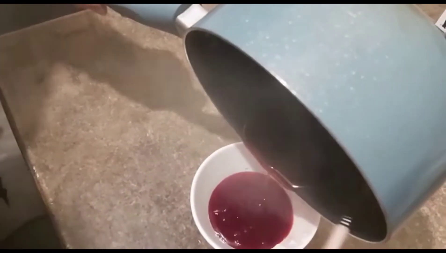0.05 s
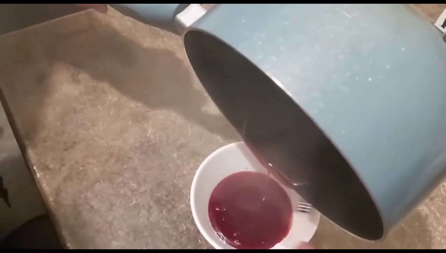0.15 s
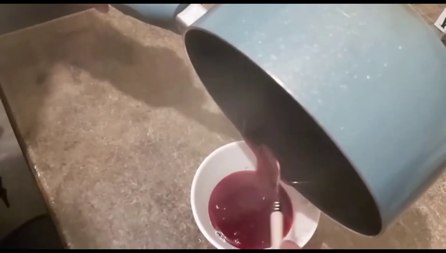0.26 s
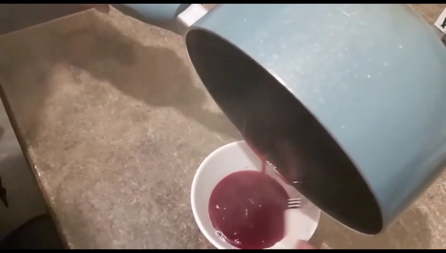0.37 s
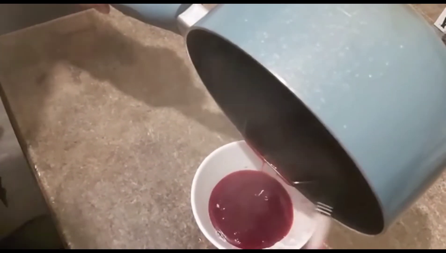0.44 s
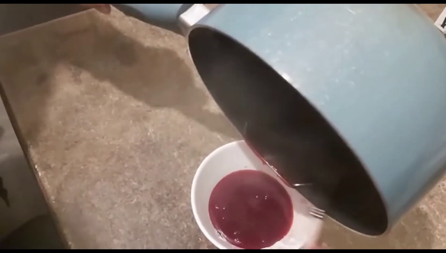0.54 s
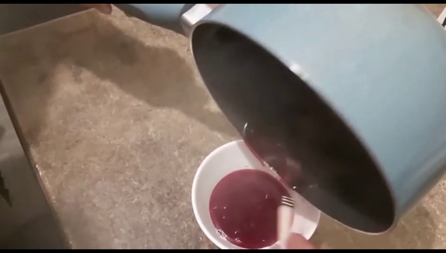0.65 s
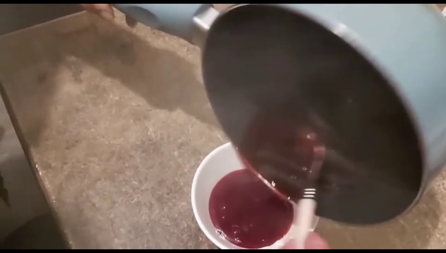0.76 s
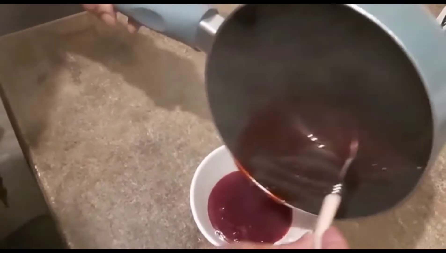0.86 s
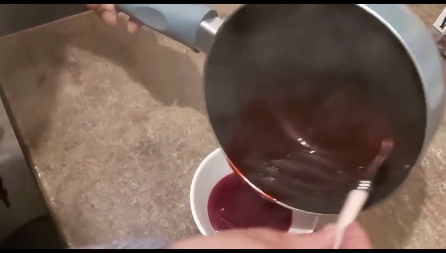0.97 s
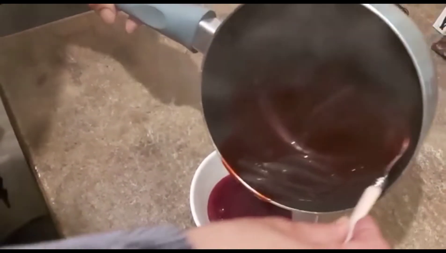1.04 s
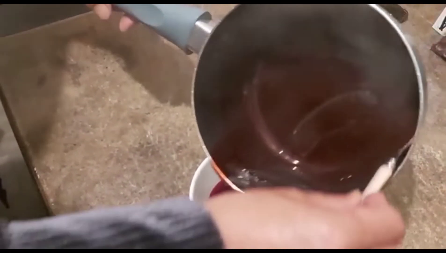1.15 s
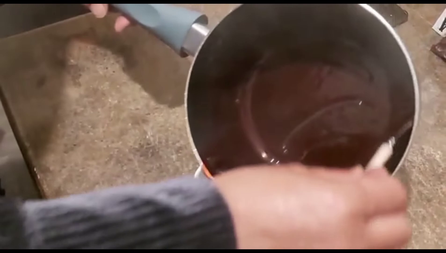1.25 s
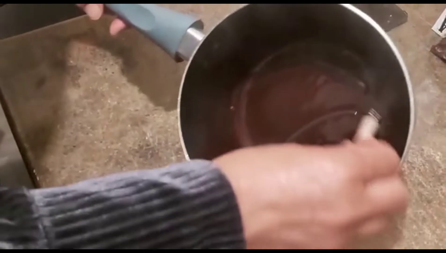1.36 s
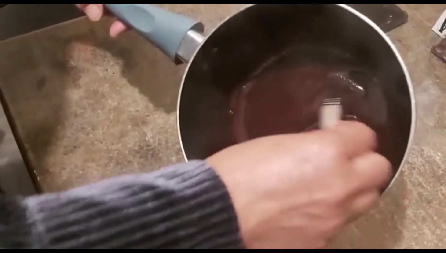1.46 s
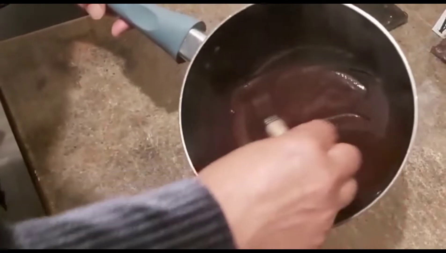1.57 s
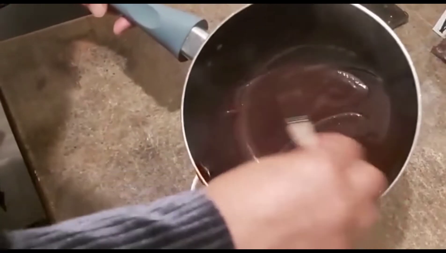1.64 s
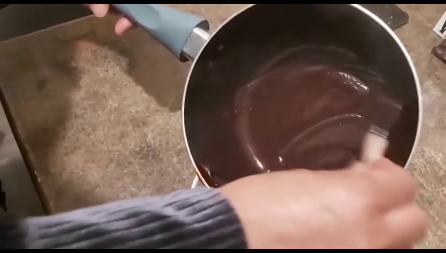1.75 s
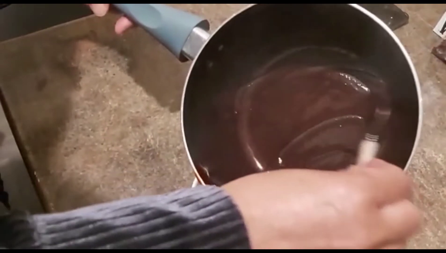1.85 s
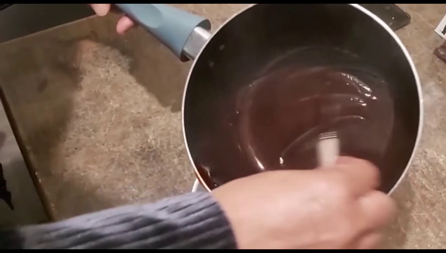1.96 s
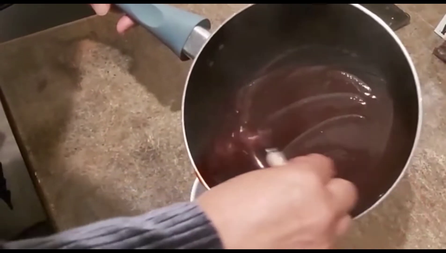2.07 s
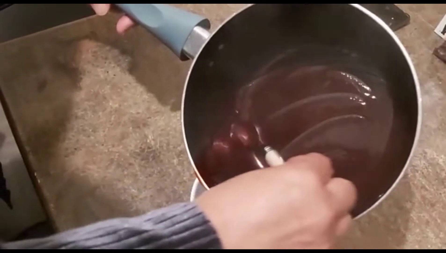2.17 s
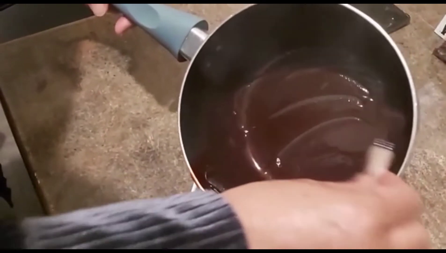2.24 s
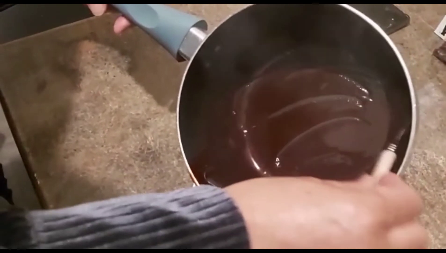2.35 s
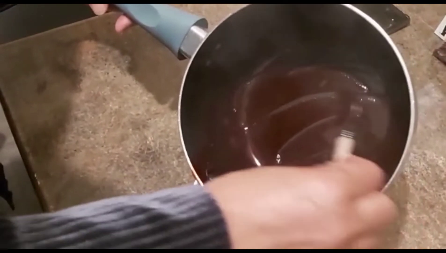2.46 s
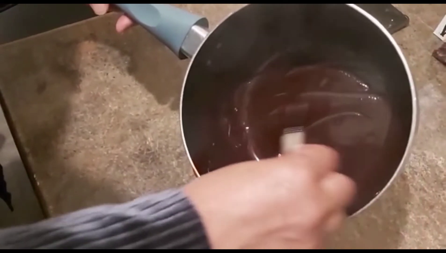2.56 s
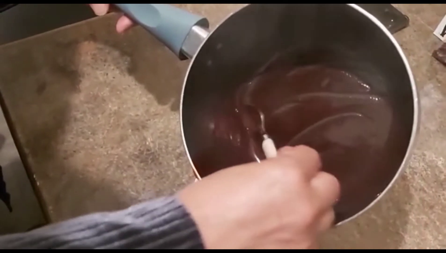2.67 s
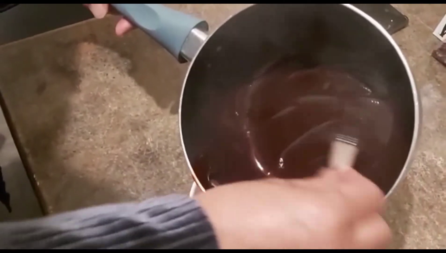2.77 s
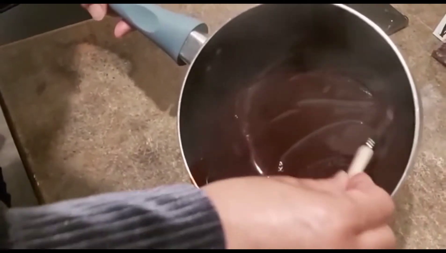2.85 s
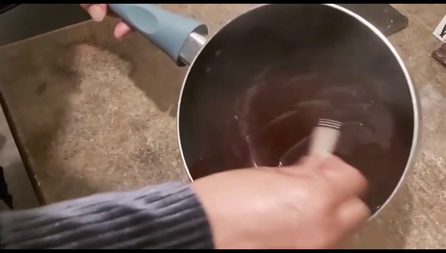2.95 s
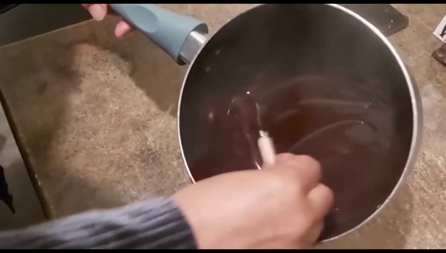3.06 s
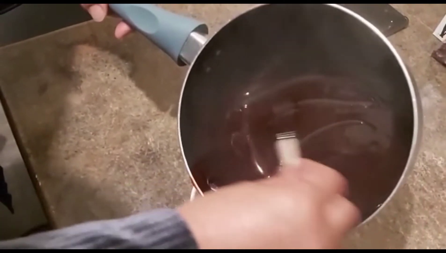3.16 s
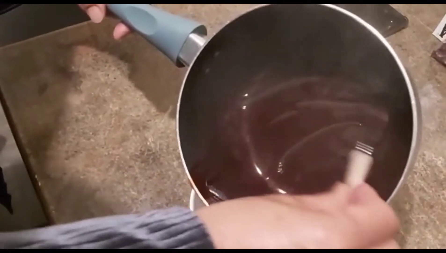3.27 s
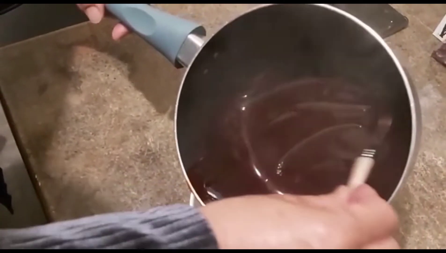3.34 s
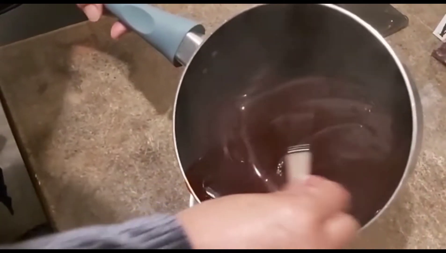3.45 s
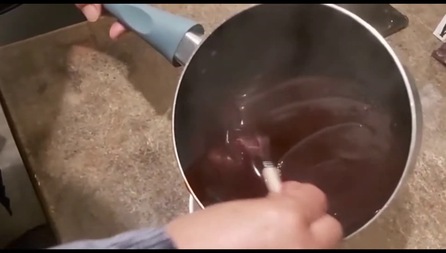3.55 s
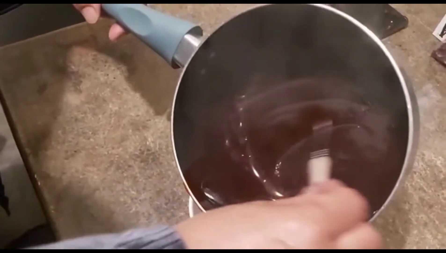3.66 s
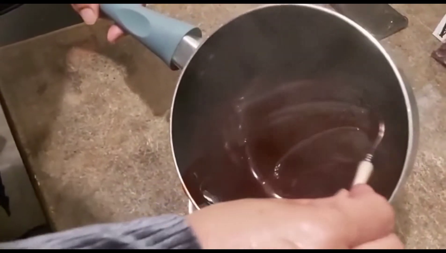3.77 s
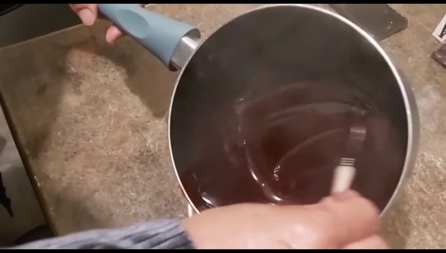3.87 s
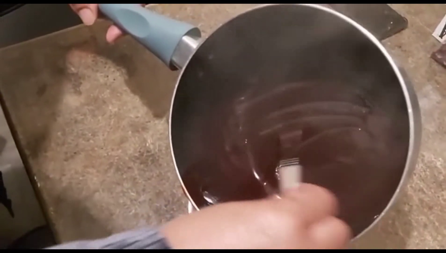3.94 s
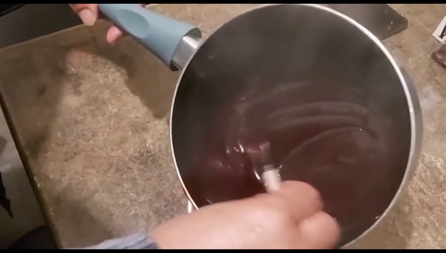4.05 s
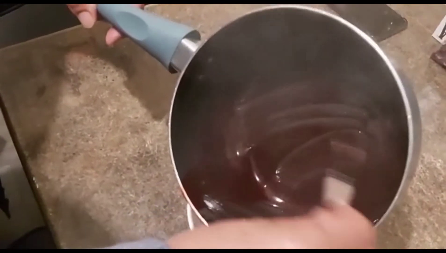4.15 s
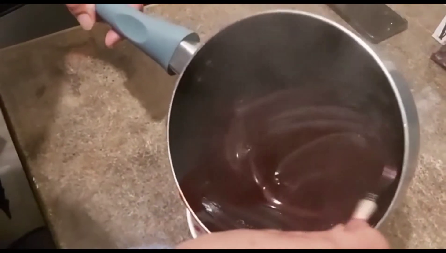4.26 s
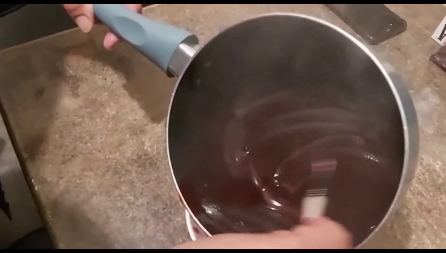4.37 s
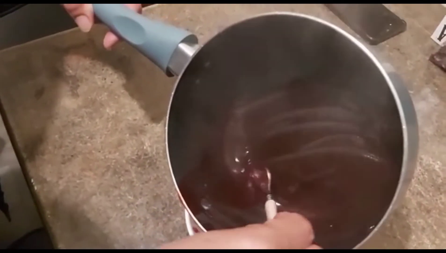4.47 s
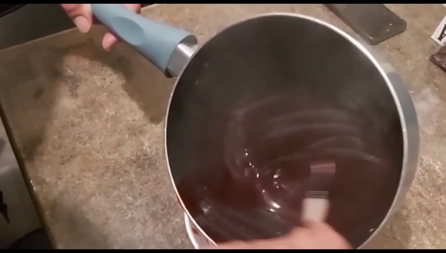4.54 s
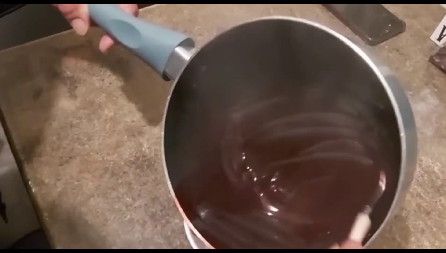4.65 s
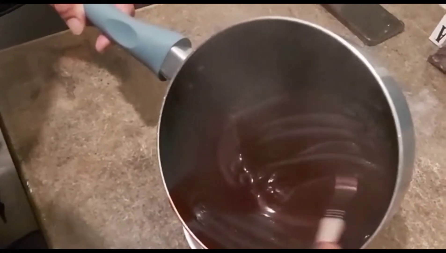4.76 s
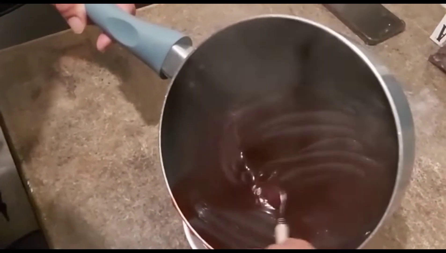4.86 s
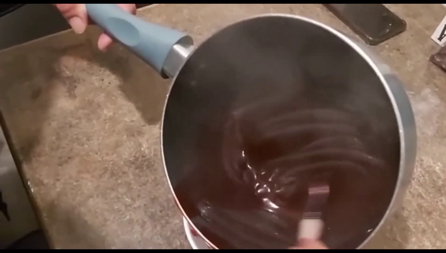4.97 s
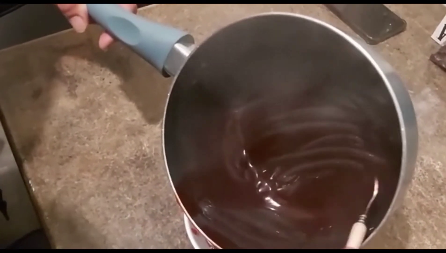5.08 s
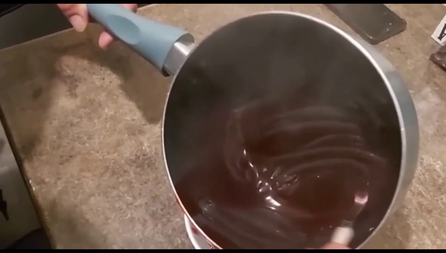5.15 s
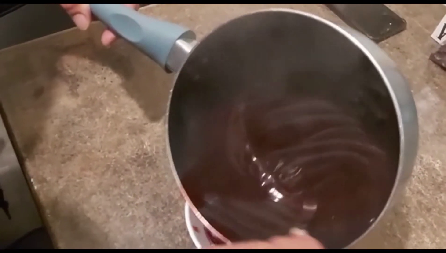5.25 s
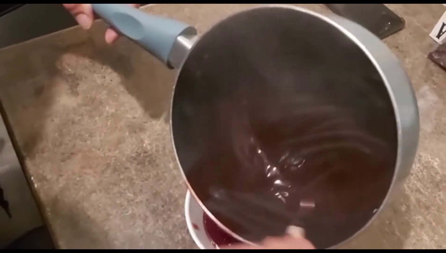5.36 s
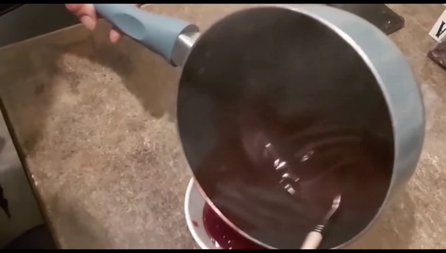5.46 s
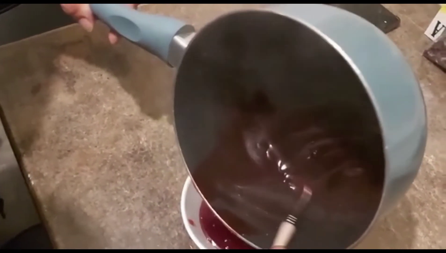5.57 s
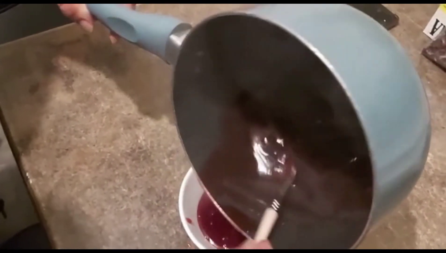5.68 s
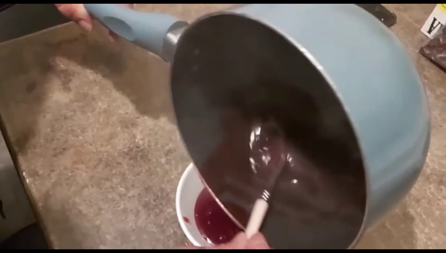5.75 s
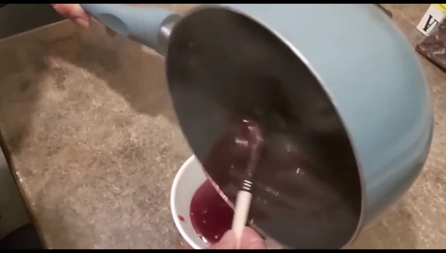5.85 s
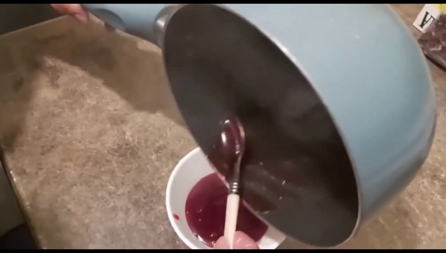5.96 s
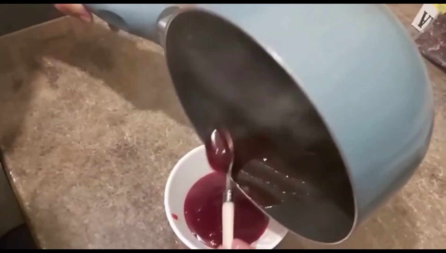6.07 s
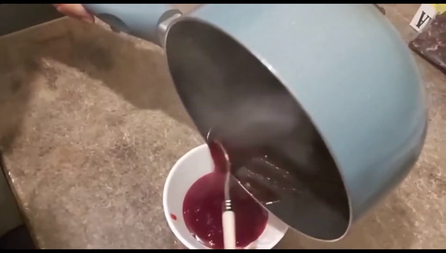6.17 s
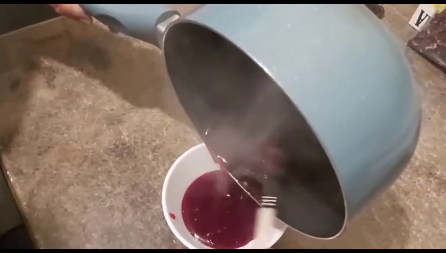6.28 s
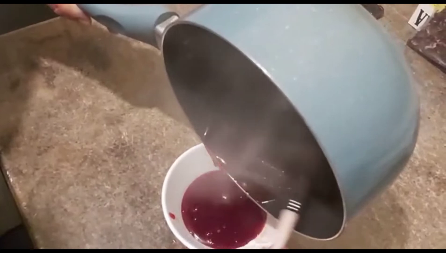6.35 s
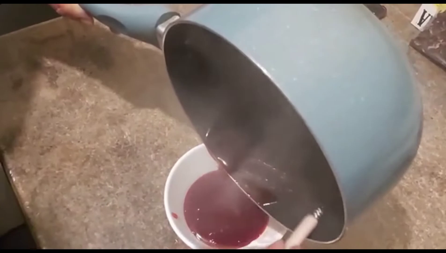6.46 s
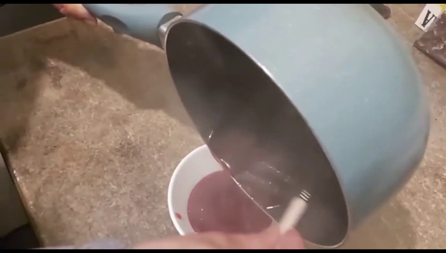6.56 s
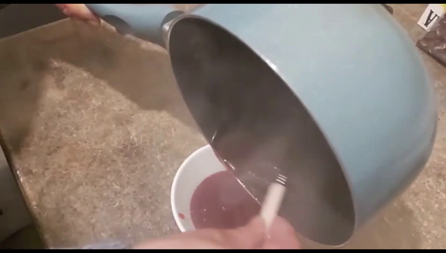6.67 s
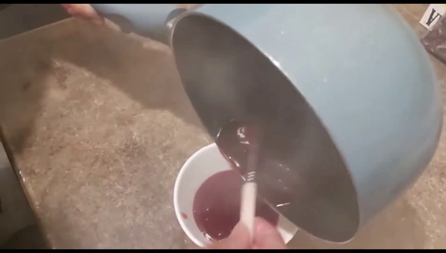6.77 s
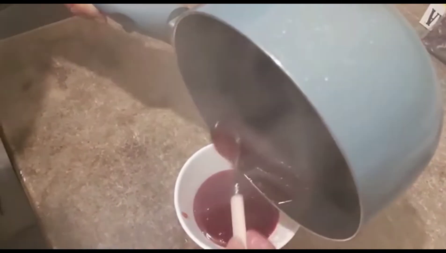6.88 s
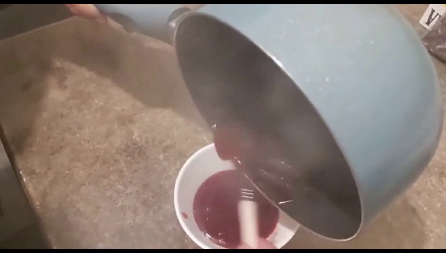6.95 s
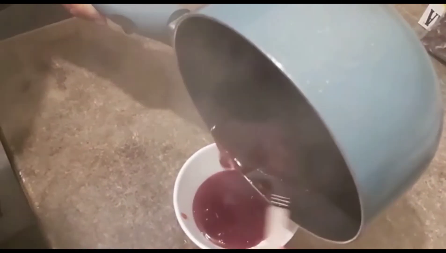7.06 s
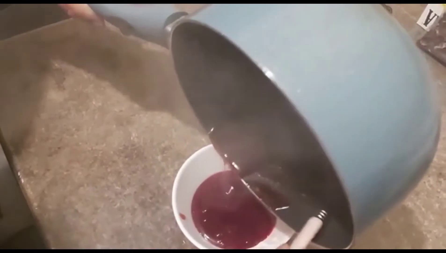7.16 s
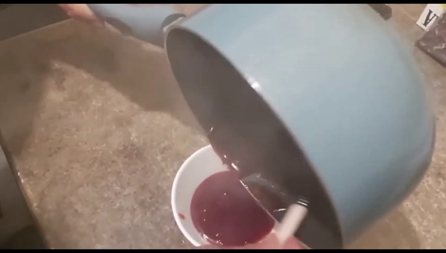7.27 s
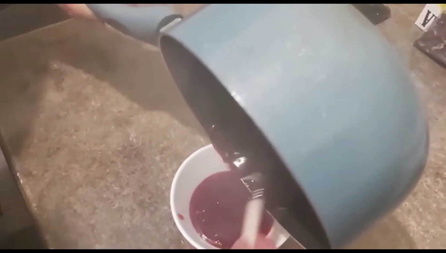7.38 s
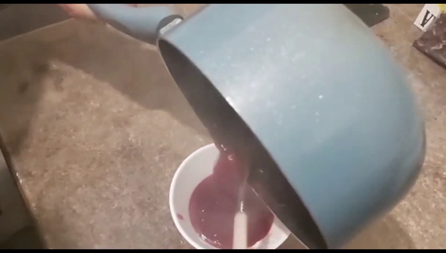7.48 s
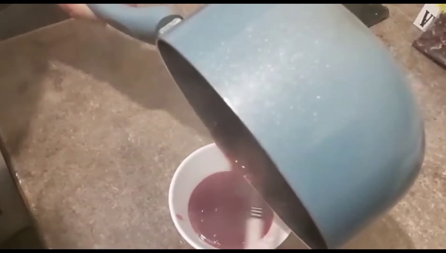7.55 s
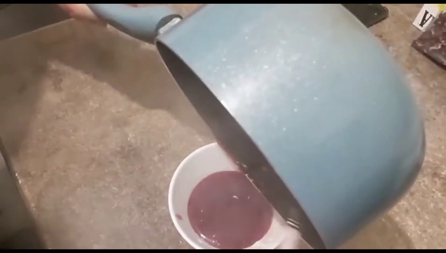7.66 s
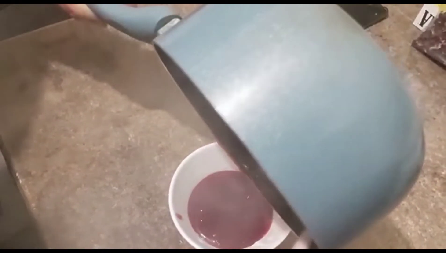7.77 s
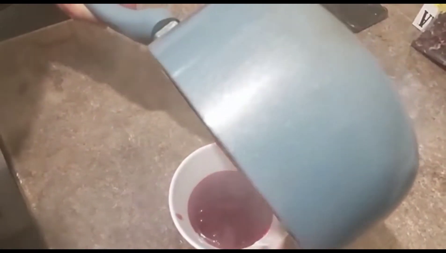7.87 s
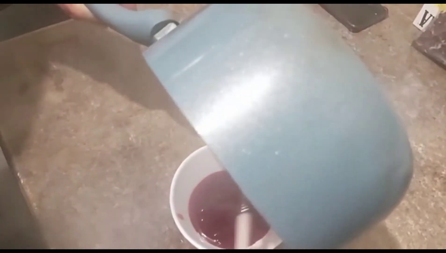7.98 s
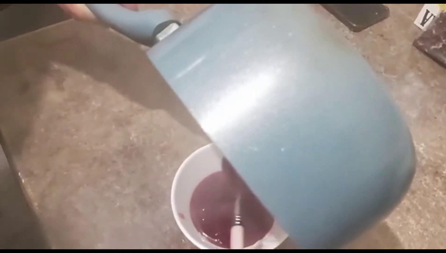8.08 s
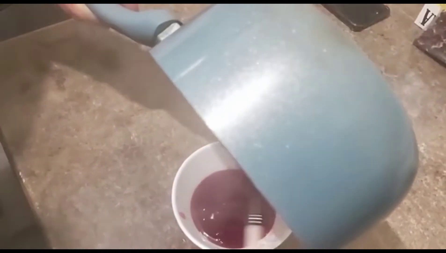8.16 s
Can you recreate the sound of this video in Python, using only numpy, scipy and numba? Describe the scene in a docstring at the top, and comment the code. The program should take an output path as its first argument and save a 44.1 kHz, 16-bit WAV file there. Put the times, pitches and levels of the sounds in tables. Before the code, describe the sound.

A metal spoon scrapes and knocks quickly inside a thin metal saucepan, ringing briefly, with sticky sauce softening the strokes in a small kitchen.

```python
"""A steel spoon scrapes hot, sticky sauce out of a thin metal pan over a kitchen counter, close to a phone.
A scrape dies away, then taps and strokes sound on the side wall, from about 1.5 s on the base, from 5.5 s on the wall.
Taps are short noise bursts; scrapes are noise made of tiny slips, and both ring the pan's decaying modes.
Throughout, delay lines echo the spoon off the kitchen, over a wavering sine hum and a floor of shaped noise."""
import sys
import numpy as np
from scipy import signal
from scipy.fft import rfft, irfft
from scipy.io import wavfile
from scipy.ndimage import uniform_filter1d
from numba import njit

SR = 44100
rng = np.random.default_rng(int(sys.argv[2]) if len(sys.argv) > 2 else 0)


def wav_out(sig):
    """Save sig, one row per channel (or a flat mono array), as 16-bit PCM at SR to the path in sys.argv[1]."""
    wavfile.write(sys.argv[1], SR, np.round(np.clip(np.atleast_2d(sig).T, -1, 1) * 32767).astype(np.int16))


N = 362502

# appliance hum before its waver: (time [s], level [dB])
HUM_SWELL = [(0.0, -70), (0.201, -66), (0.73, -63.5), (0.98, -81), (1.58, -63), (1.92, -75), (3.18, -61),
             (3.36, -70.5), (3.75, -71.5), (4.442, -56.5), (4.97, -75), (5.45, -62.5), (5.91, -71.5),
             (6.748, -60.5), (7.12, -79), (7.35, -70), (8.06, -62), (8.22, -67)]
# colour of the room noise: (frequency [Hz], relative density [dB per Hz])
FLOOR_COLOUR = [(18, -48.5), (30, -29.5), (81, 1.5), (153, -9), (210, -0.5), (259, -9), (364, -1),
                (632, -18.5), (5040, -30), (6720, -38), (8080, -38), (14800, -32.5), (16000, -57.5)]
# where the spoon touches: (time [s], place [0 base - 1 side wall])
SPOON_PLACE = [(0, 1), (1.38, 0.94), (1.48, .05), (2.1, .04), (2.6, .06), (3.9, .04), (4.25, 0.17),
               (4.45, .06), (5.0, 0.11), (5.15, 0.51), (5.35, 0.097), (5.55, 0.89), (5.8, .8), (6.1, 0.92),
               (6.9, 0.88), (7.5, 0.97), (8.2, .85)]
# pan modes, decay before the losses of spoon and coating:
# (frequency [Hz], t60 [s], drive from the base [dB], drive from the wall [dB])
PAN_MODES = [(260, 0.49, -32, -6), (673, 0.16, -23, -27.5), (795, 0.047, -18, -16.5), (994, 0.034, -4, -22),
             (927.5, 0.13, -5.5, -8), (937.2, 0.22, -9.5, -11), (1180, 0.02, -42.5, -13),
             (1481, 0.22, -23, -9.5), (1539, 0.088, -24, -1.5), (1892, 0.1, 3.5, -16.5),
             (1839, 0.45, -2, -10.5), (1973, 0.027, -0.5, -6.5), (2060, 0.04, -9.5, -14.5),
             (2175.5, 0.085, -26.5, 2.5), (2582, 0.48, -37, -9.5), (2948, 0.18, 3.5, -36.5),
             (3136, 0.11, -18, -6), (3527, 0.12, -4.5, -6.5), (3525, 0.15, -1, -17),
             (3947, 0.25, -20.5, -7), (4340, 0.58, -8, -22), (4360, 0.021, 6.5, -2),
             (4835, 0.69, 1.5, -22.5), (5250, 0.054, -15, 1), (5880, 0.39, -26, -11), (5886, 0.017, 9, -22),
             (6400, 0.51, -12, -11.5), (6970, 0.031, -15, -0.5), (7644, 0.039, -6.5, -8),
             (9600, 0.018, -19, -19.5)]
# the spoon lands or knocks: (time [s], burst level [dB], tick against it [dB], thud against it [dB])
SPOON_TAPS = [(0.1101, -10, -14.5, -9.5), (0.3015, -34, -21, -13), (0.5335, -58, -19, 23.5),
              (0.5849, -14, -7.5, -3.5), (1.2156, -53.5, -20, 23.5), (1.255, -33, -28, 0.5),
              (1.4073, -49.5, -17, 10), (1.632, -51.5, -16, 11), (1.9618, -21.5, -25, 0),
              (2.1662, -24.5, -37, 3.5), (2.3872, -43.5, 9.5, -2.5), (2.4899, -37, -21, 1.5),
              (2.928, -25.5, -30, -43.5), (3.129, -36, -9, 6), (3.4452, -17, -24.5, -19.5),
              (3.6182, -18, -24, 1), (3.923, -14, -17, -28), (4.334, -19.5, -22.5, 1),
              (4.5473, -33, -25, 7), (4.5895, -34.5, -24, 3.5), (4.8166, -18, -26, -3.5),
              (5.1444, -20, -26, -3), (5.2586, -9.5, -67, -4), (5.4966, -28, -34, 3),
              (5.609, -18.5, -3.5, 2), (5.639, -32, -18, 6), (6.5346, -21, 5.5, -5), (7.264, -27, -10, -11),
              (7.73, -54, 6, 2.5), (7.809, -14.5, -5.5, -9.5)]
# short scrapes that fade from their first moment, most after a tap, the first already dying away:
# (time [s], level [dB], fade [dB/s], edge hiss against it [dB], rub centre [Hz], rub against it [dB])
FADING_SCRAPES = [(0, -66.5, 349, -25, 1502, -3), (0.111, -26.5, 148, -7.5, 1482, -29),
                  (0.535, -69, 64, -18, 510, 10), (0.586, -26.5, 199, -21, 1350, -21.5),
                  (1.217, -46.5, 127.5, -30, 1451, -10.5), (2.172, -43.5, 779, 0, 860, -0.5),
                  (2.391, -43, 467, -8.5, 732, -4), (2.932, -37, 201, -20, 687, -15),
                  (3.621, -35, 629.5, -1.5, 855, 4.5), (5.149, -26, 508, -11.5, 1437, -16),
                  (5.496, -35, 515, -14, 1420, -6.5), (5.611, -34, 100.5, -14.5, 958, -10),
                  (6.539, -33, 108, -7.5, 943, -25), (7.268, -41.5, 102, -6.5, 968, -12.5),
                  (7.733, -68.5, 56, -8, 483.4, 2), (7.81, -34.5, 75, -6.5, 953, -23)]
# strokes rise or fall to a held level, then lift off:
# (time [s], level change [s], hold [s], first level [dB], held level [dB], lift [dB/s],
# edge hiss against it [dB], rub centre [Hz], rub glide [octaves/s], rub against it [dB], sauce [0 bare - 1 thick])
SCRAPE_STROKES = [(0.135, 0.089, .11, -38.5, -28.5, 329.5, -17, 1100, 2, -13.5, 0.25),
                  (0.593, 0.041, 0.091, -37, -30, 304, -12, 1349, -1.5, -18.5, 0.41),
                  (1.335, .21, .01, -60.5, -31, 398, -17, 750, 1.5, -16.5, 0.035),
                  (1.962, .005, 0.12, -20.5, -33.5, 597.5, -17.5, 800, 3.5, -11, 0.088),
                  (2.458, 0.052, .11, -59, -32, 422, -23, 700, 6.5, -11.5, .02),
                  (2.939, 0.085, .072, -40, -29.5, 799.5, -20.5, 800, 2, -19.5, .02),
                  (3.127, 0.02, 0.01, -38.5, -32, 500, -3.5, 700, 5, -8.5, .02),
                  (3.444, .005, 0.12, -18, -27.5, 750.5, -16, 800, 0, -14, .02),
                  (3.917, .005, 0.13, -32.5, -29, 548, -17, 750, 6, -12, 0.022),
                  (4.138, 0.089, 0.087, -58.5, -39.5, 297.5, -14.5, 450, 2.5, -14, 0.4),
                  (4.345, 0.055, 0.056, -38, -23, 201, -16.5, 700, 2, -18, .02),
                  (4.817, 0.036, 0.071, -32.5, -25, 199, -15.5, 750, -2, -19, 0.033),
                  (5.189, .05, 0.013, -55.5, -48.5, 403, -7.5, 1563, 6.5, -8.5, 0.018),
                  (5.262, 0.006, 0.076, -18.5, -28, 259.5, -17.5, 700, 0, -14.5, .02),
                  (5.541, .05, 0.0062, -53, -50, 395, -27, 1300, 1, -8, .05),
                  (5.733, .21, .1, -53.5, -36.5, 300.5, -16, 1243, -0.5, -4.5, 0.26),
                  (6.04, .05, 0.073, -46, -39.5, 550.5, -22.5, 1448, 3, -7.5, 0.18),
                  (6.629, .25, 0.064, -47.5, -36.5, 429.5, -11, 1746, 5.5, -9, 0.2),
                  (7.37, 0.12, 0.037, -49, -31, 379, -14, 1000, 6, -14.5, 0.19),
                  (7.905, 0.12, .07, -42, -31.5, 349, -12, 1300, 4, -16.5, 0.11)]
# bands of the edge hiss: (low edge [Hz], high edge [Hz], relative level [dB])
EDGE_BANDS = [(6070, 10000, -2.5), (10400, 14000, -10)]

HUM_HZ = 88  # centre of its slow waver
FLOOR_DB, FLOOR_UNSTEADY_DB = -68.5, 2
KITCHEN_T60_S, KITCHEN_DAMP, KITCHEN_DB = 0.25, 0.14, -10.5  # the damping shortens the treble further
BLOCK = 256  # samples between updates of the pan
TAP_RING_DB, TAP_CRACK_DB = -22.5, 0.5
HISS_LIFT = 4.3  # as a stroke lifts, its hiss falls this many times faster in dB than the scrape
RING_DB, RASP_DB = 0, -17  # both for a bare pan
RUB_Q, RUB_DB = 2.5, -7
HISS_UNSTEADY_DB = 3
PORT_LAG = 4  # samples
TOP_HZ = 15300


def undb(db):
    """Decibels to gain."""
    return 10 ** (np.asarray(db) / 20)


def unit(x):
    """Scale to rms 1."""
    return x / np.sqrt(np.mean(x ** 2))


def curve(s, value):
    """Straight lines between points, one value a sample."""
    return np.interp(np.arange(N) / SR, s, value)


def band(x, lo_hz, hi_hz):
    """Causal band-pass, its top edge kept below the Nyquist limit."""
    edges = [lo_hz, min(hi_hz, .45 * SR)]
    return signal.sosfilt(signal.butter(2, edges, "bandpass", fs=SR, output="sos"), x)


def walk(rate):
    """Random levels held 1 / rate s and smoothed twice; spread near 1."""
    k = int(SR / rate)
    steps = np.repeat(rng.standard_normal(N // k + 1), k)
    return unit(uniform_filter1d(uniform_filter1d(steps, k), k)[:N])


def drifts(rate, count):
    """Unrelated slow walks, one value a block; spread 1."""
    size = int(SR / BLOCK / rate)
    noise = rng.standard_normal((count, N // BLOCK + 1))
    return unit(uniform_filter1d(uniform_filter1d(noise, size, axis=1), size, axis=1))


def ports(make, alike):
    """A broad sound at the phone's two ports, with a shared part of power 'alike'."""
    return np.sqrt(alike) * make() + np.sqrt(1 - alike) * np.array([make(), make()])


def room_floor(hum_db):
    """Quiet noise, shaped over frequency; its low part swells along with the hum."""
    hz, db = np.transpose(FLOOR_COLOUR)
    f = np.fft.rfftfreq(N, 1 / SR) + 1  # the offset keeps the logarithm finite
    noise = ports(lambda: rng.standard_normal(N), alike=0.59)
    colour = undb(np.interp(np.log(f), np.log(hz), db))
    floor = unit(irfft(rfft(noise) * colour, N))
    floor = floor * undb(FLOOR_DB + FLOOR_UNSTEADY_DB * walk(8))
    return floor + band(floor, 40, 320) * undb(.5 * (hum_db + 60))


def appliance_hum(hum_db):
    """A sine that wavers slowly in pitch and faster in level."""
    hz = HUM_HZ + 1.4 * walk(1)
    sine = np.sqrt(2) * np.sin(2 * np.pi * np.cumsum(hz) / SR)
    return sine * undb(hum_db + 1.3 * walk(15))


def kitchen():
    """Appliance hum over quiet room noise, stronger at the right port."""
    hum_db = curve(*np.transpose(HUM_SWELL))
    return (room_floor(hum_db) + appliance_hum(hum_db)) * undb([[-2.2], [2.2]])


@njit
def walls(x, lags, gain, damp):
    """Eight delay lines that feed each other, duller on every round."""
    line, soft, out = np.zeros((8, 4096)), np.zeros(8), np.zeros((2, len(x)))
    for i in range(len(x)):
        total = 0.
        for k in range(8):
            soft[k] += (1 - damp) * (gain[k] * line[k, (i - lags[k]) & 4095] - soft[k])
            total += soft[k]
            out[k % 2, i] += soft[k]
        for k in range(8):
            line[k, i & 4095] = x[i] + 1e-18 + soft[k] - total / 4
    return out


def kitchen_echo(spoon):
    """The walls return the spoon as a short dense tail."""
    lags = rng.integers(500, 2200, 8)
    gain = undb(-60 * lags / SR / KITCHEN_T60_S)  # loss of one round
    return walls(spoon.mean(axis=0), lags, gain, KITCHEN_DAMP) * undb(KITCHEN_DB)


def touch():
    """Gains of scrape, hiss and rub, rub centre and sauce; the strongest contact dominates the last two."""
    t = np.arange(N) / SR
    power, tone = np.full((3, N), 1e-14), np.zeros((2, N))
    tone[0] = 1e-14 * np.log2(1000)  # untouched, the rub rests at 1 kHz
    for s, db, fade_db, hiss_db, hz, rub_db in FADING_SCRAPES:
        a = slice(int(s * SR), int((s + .5) * SR))
        p = undb(2 * (db - fade_db * (t[a] - s)))
        power[:, a] += p * undb([[0], [2 * hiss_db], [2 * rub_db]])
        tone[:, a] += p * np.array([[np.log2(hz)], [0.2]])  # a little sauce under each
    for s, change, hold, first_db, held_db, lift_db, hiss_db, hz, glide, rub_db, sauce in SCRAPE_STROKES:
        a = slice(int(s * SR), int((s + .6) * SR))
        age = t[a] - s
        lifted_db = lift_db * np.maximum(age - change - hold, 0)
        level_db = np.interp(age, [0, max(change, .001)], [first_db, held_db])
        p = undb(2 * (level_db - lifted_db))
        power[0, a] += p
        power[1, a] += p * undb(2 * (hiss_db - (HISS_LIFT - 1) * lifted_db))
        power[2, a] += p * undb(2 * rub_db)
        # the rub glides in pitch as the spoon travels
        tone[0, a] += p * (np.log2(hz) + glide * (age - change))
        tone[1, a] += p * sauce
    tone = tone / power[0]
    gains = uniform_filter1d(np.sqrt(power), size=128, axis=1)
    return gains, 2 ** tone[0], np.clip(tone[1], 0, 1)


@njit
def ring(base, wall, pole, drive, ears, block):
    """Decaying modes pushed from two places; pitch, decay, drive and path to each port change by the block."""
    out = np.zeros((2, len(base)))
    for m in range(len(pole)):
        z = 0j
        for i in range(len(base)):
            k = i // block
            z = z * pole[m, k] + drive[m, 0, k] * base[i] + drive[m, 1, k] * wall[i] + 1e-18
            out[0, i] += (z * ears[m, 0, k]).imag
            out[1, i] += (z * ears[m, 1, k]).imag
    return out


def build_pan(body):
    """The pan as a bank of modes; returns a function that gives its sound for a push."""
    wall = np.clip(curve(*np.transpose(SPOON_PLACE)), 0, 1)
    hz, t60, base_db, wall_db = np.transpose(PAN_MODES)[:, :, None]
    # the pressing spoon bends each pitch a little
    bent = hz * (1 + 0.0048 * drifts(12, count=len(hz)))
    # while it presses hard it also damps the ring, which widens every mode
    pressure = np.clip((20 * np.log10(body[::BLOCK]) + 82.0) / 22, 0, 1)
    loss = 1 / np.maximum(t60, .01) + 2.7 * pressure + hz / 800  # the coating eats high modes faster
    pole = np.exp(2j * np.pi * bent / SR - np.log(1000) * loss / SR)
    # the moving spoon crosses nodes and loops, so each mode is driven now more, now less
    drive_db = np.stack([base_db, wall_db], axis=1)
    drive = undb(drive_db + 2.2 * drifts(9, count=len(hz))[:, None])
    # the pan turns in the hand; higher modes radiate in finer lobes, so the ports agree less on them
    lobes = np.clip(hz / 3000, .45, 1.2)
    turn = np.stack([drifts(7.9, count=len(hz)), drifts(14, count=len(hz))], axis=1) * lobes[:, None]
    # the lowest mode and those near 4.3 kHz favour the right port
    left_db = -5 * np.exp(-(np.log(hz / 4300) / .3) ** 2) - 6 * (hz < 400)
    ears = undb(np.stack([left_db, -left_db], axis=1) / 2) * np.exp(1j * turn)
    return lambda push: ring(push * np.sqrt(1 - wall), push * np.sqrt(wall), pole, drive, ears, BLOCK)


def taps(pan):
    """Each tap is milliseconds of chatter that cracks, ticks and thuds; crack and thud ring the pan."""
    t = np.arange(1024) / SR
    blow, tick, thud = np.zeros((3, 2, N + len(t)))
    chance = rng.standard_normal((len(SPOON_TAPS), 2, len(t)))
    for (s, db, sharp_db, thud_db), noise in zip(SPOON_TAPS, chance):
        at = slice(int(s * SR), int(s * SR) + len(t))
        noise = (noise + .15 * noise[0]) * np.minimum(t / .0007, 1)  # 0.7 ms rise
        noise = noise / np.sqrt(np.mean(noise[:, :128] ** 2))
        blow[:, at] += undb(db) * noise * np.exp(-t / .0012)
        tick[:, at] += undb(db + sharp_db) * noise * np.exp(-t / 0.0044)
        thud[:, at] += undb(db + thud_db) * noise * np.exp(-t / 0.0068)
    crack = band(blow[:, :N], 2400, 9800) * undb(TAP_CRACK_DB)
    knock = band(thud[:, :N], 690, 1100) * undb(1.0)
    high_tick = band(tick[:, :N], 8000, 11500) * undb(-2)
    push = crack[0] + 0.36 * band(thud[0, :N], 370, 880)
    return pan(push) * undb(TAP_RING_DB) + crack + knock + high_tick


def grit(per_s, scatter_db):
    """Dense tiny slips of uneven size over smooth friction, all of it in patches."""
    size = undb(scatter_db * np.minimum(rng.exponential(size=N), 3))
    slips = (rng.random(N) < per_s / SR) * size * rng.standard_normal(N)
    friction = unit(slips) + 1.1 * rng.standard_normal(N)
    return unit(friction * undb(2.0 * walk(80) + 1.34 * walk(25)))


@njit
def sweep(x, hz, q):
    """State-variable band-pass whose centre moves."""
    y, b, l = np.empty(len(x)), 0., 0.
    for i in range(len(x)):
        g = np.tan(np.pi * hz[i] / SR)
        v = (b + g * (x[i] - l)) / (1 + g * (g + 1 / q))
        b, l, y[i] = 2 * v - b, l + 2 * g * v, v / q
    return y


def hollow_rub(friction, rub_hz):
    """A hollow colour that moves with the spoon: friction through two moving band-passes."""
    return np.array([unit(sweep(sweep(x, rub_hz, RUB_Q), rub_hz, RUB_Q)) for x in friction])


def edge_hiss(rough):
    """Scrape hiss in two high bands, each with a random unsteady level."""
    edge = np.zeros((2, N))
    for lo_hz, hi_hz, db in EDGE_BANDS:
        hiss_band = band(band(rough, lo_hz, hi_hz), lo_hz, hi_hz)
        edge += hiss_band * undb(db + HISS_UNSTEADY_DB * walk(30))
    return unit(edge) * undb([[.8], [-.8]])


def scrape(pan, gains, rub_hz, sauce):
    """Friction rings the pan and is also heard straight, as rasp, squelch, edge hiss and hollow rub."""
    body, hiss, rub = gains
    # keep the push above about 650 Hz, so the ringing stays free of bass
    slips = band(band(grit(per_s=3000, scatter_db=6.0), 680, 12000), 630, 23000)
    loud = np.sqrt(np.mean(pan(slips) ** 2))
    rough = ports(lambda: grit(per_s=4700, scatter_db=0.5), alike=0.05)
    hollow = hollow_rub(rough + 0.12 * slips, rub_hz) * rub
    # sauce cushions the slips: less ring, but more rasp and a low squelch
    # the rub mostly shakes the modes that lie under it
    push = slips * body * undb(-9 * sauce) + 1.04 * hollow[0]
    ringing = pan(push) * undb(RING_DB) / loud
    rasp = unit(band(rough, 1900, 3400)) * body * undb(RASP_DB + 20 * sauce)
    squelch = unit(band(rough[0] + .5 * rough, 300, 670)) * body * sauce * undb([[-11], [-6]])
    return ringing + rasp + squelch + hollow * undb(RUB_DB) + edge_hiss(rough) * hiss


def scene():
    """Spoon and pan, their echo off the kitchen walls, the background."""
    contact = touch()
    pan = build_pan(contact[0][0])
    spoon = scrape(pan, *contact) + taps(pan)
    spoon[1] = np.roll(spoon[1], shift=PORT_LAG)  # the pan stands nearer the left port
    return spoon + kitchen_echo(spoon) + kitchen()


def record(dry):
    """The phone rounds the loudest peaks and cuts the top."""
    rounded = np.tanh(.7 * dry) / .7
    return signal.sosfilt(signal.ellip(8, .2, 70, TOP_HZ, fs=SR, output="sos"), rounded)


dry = scene()
out = record(dry)
wav_out(out)
```